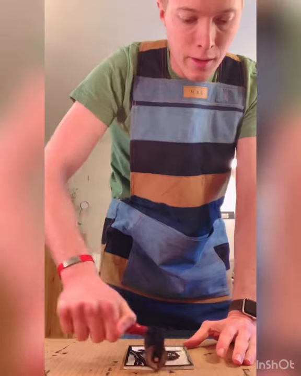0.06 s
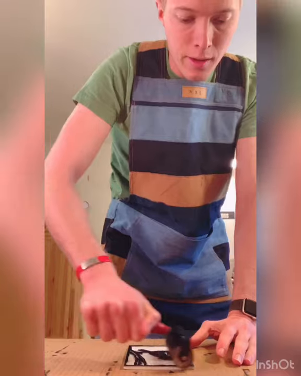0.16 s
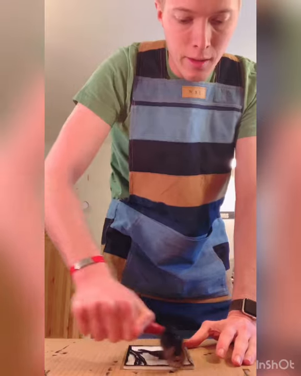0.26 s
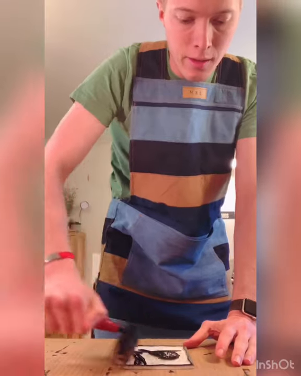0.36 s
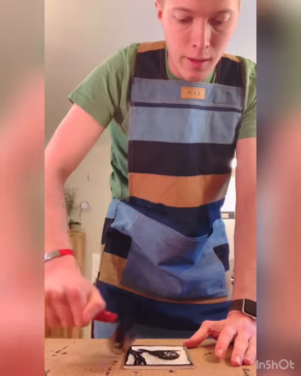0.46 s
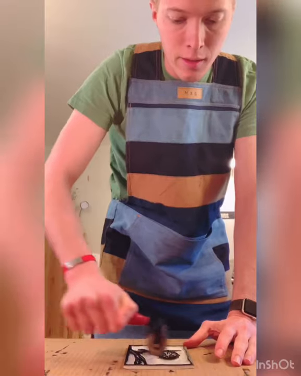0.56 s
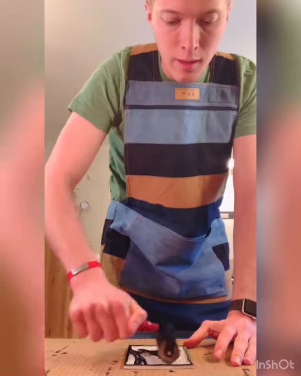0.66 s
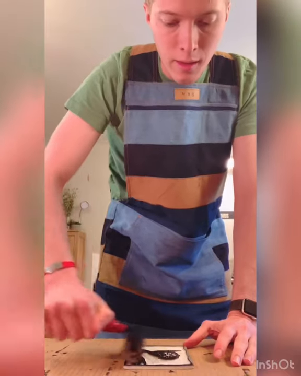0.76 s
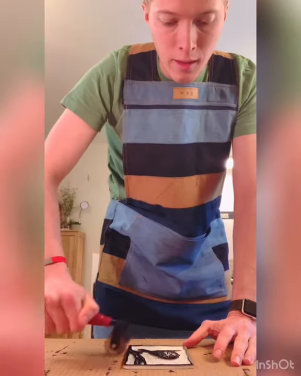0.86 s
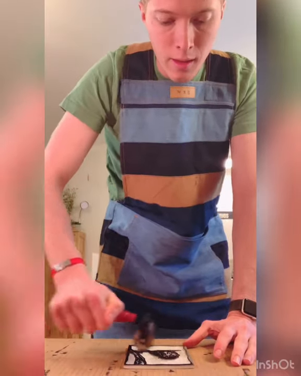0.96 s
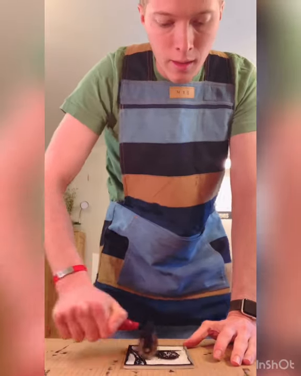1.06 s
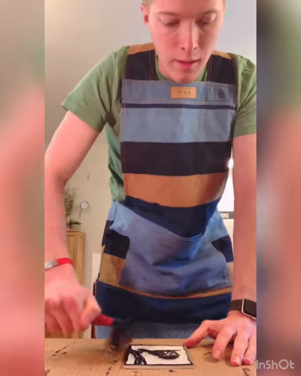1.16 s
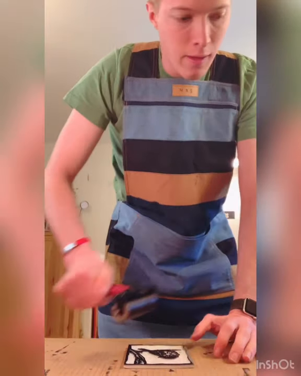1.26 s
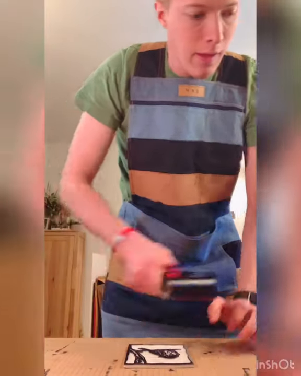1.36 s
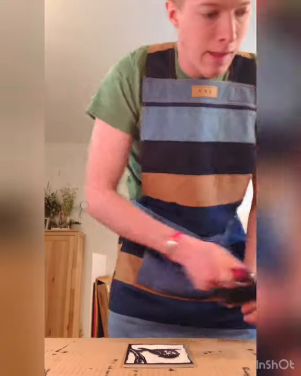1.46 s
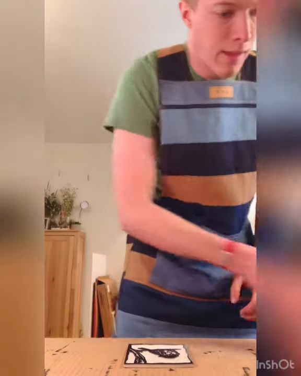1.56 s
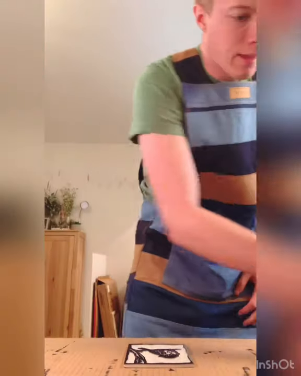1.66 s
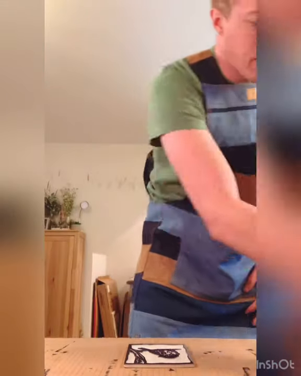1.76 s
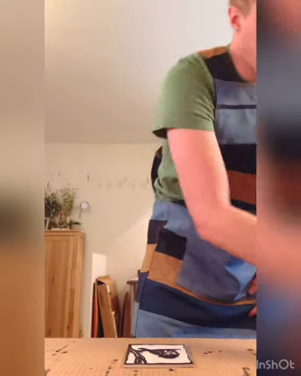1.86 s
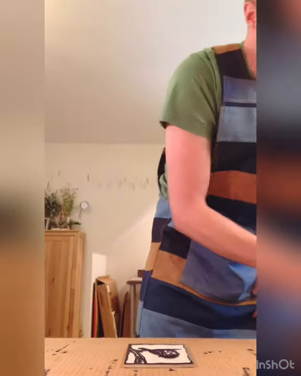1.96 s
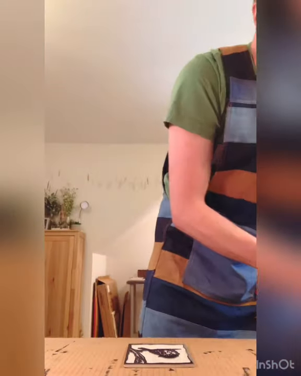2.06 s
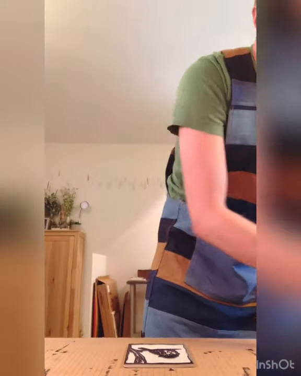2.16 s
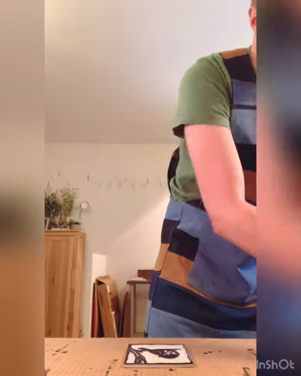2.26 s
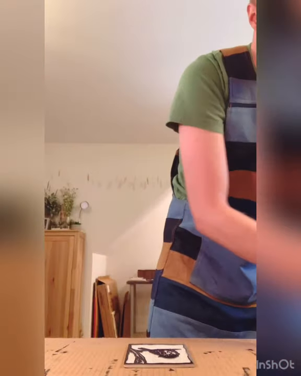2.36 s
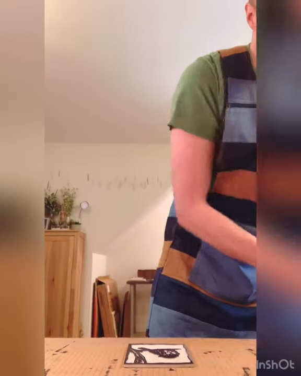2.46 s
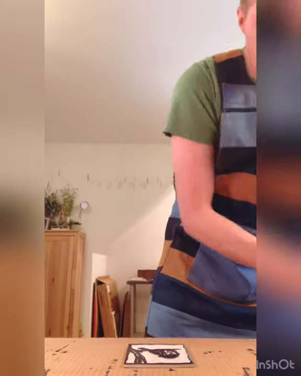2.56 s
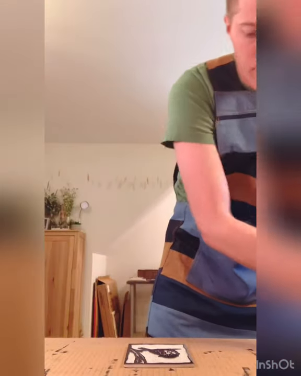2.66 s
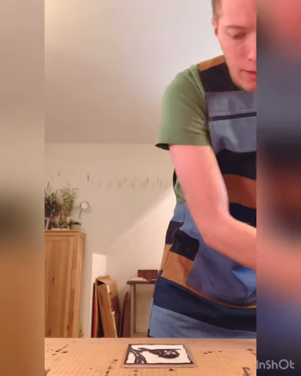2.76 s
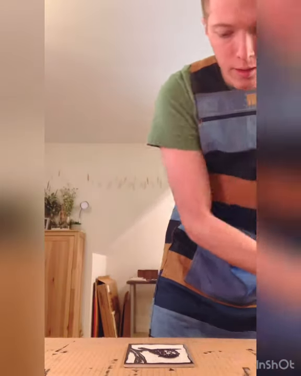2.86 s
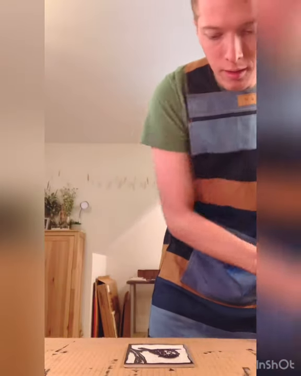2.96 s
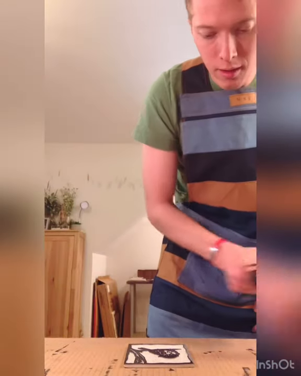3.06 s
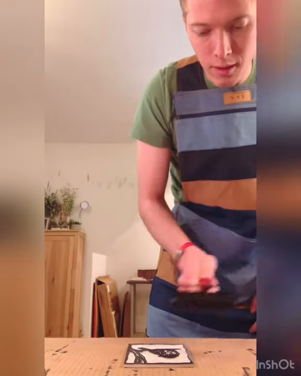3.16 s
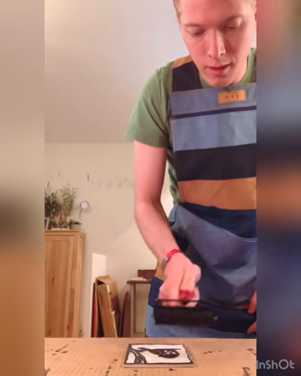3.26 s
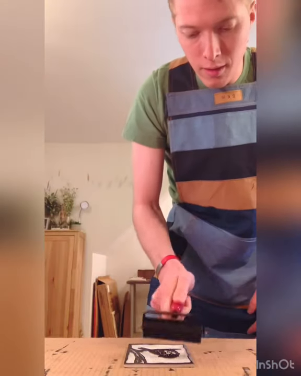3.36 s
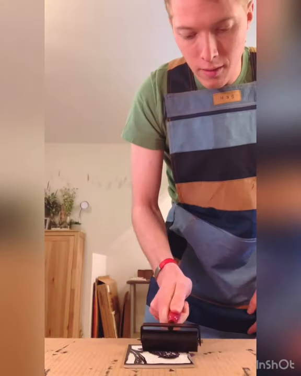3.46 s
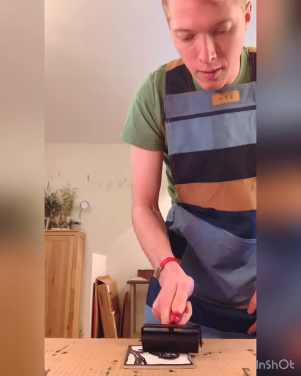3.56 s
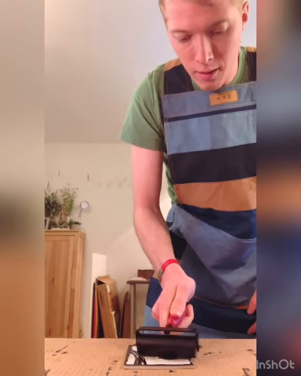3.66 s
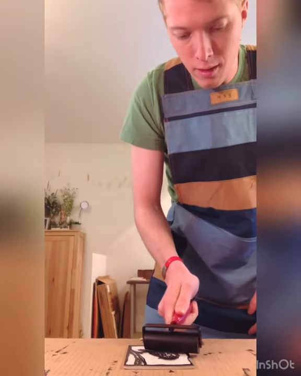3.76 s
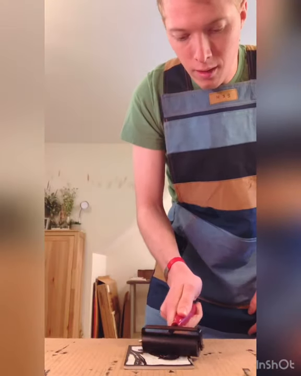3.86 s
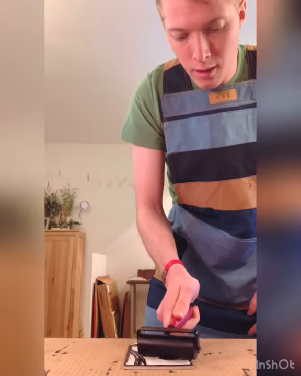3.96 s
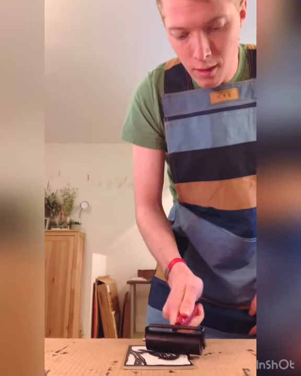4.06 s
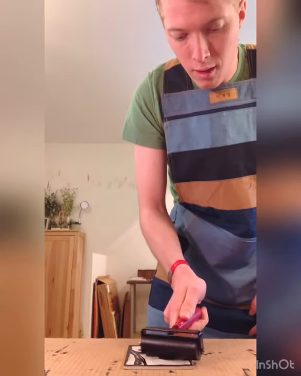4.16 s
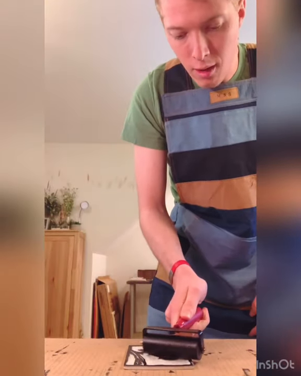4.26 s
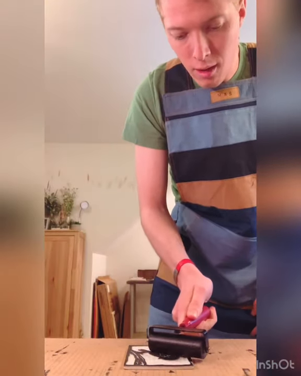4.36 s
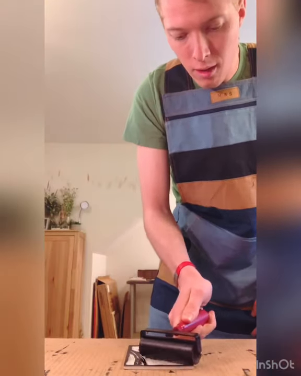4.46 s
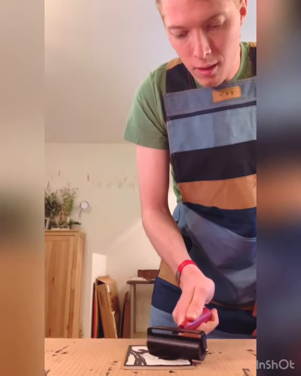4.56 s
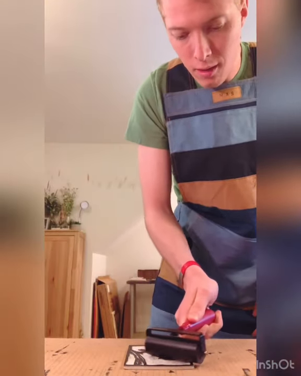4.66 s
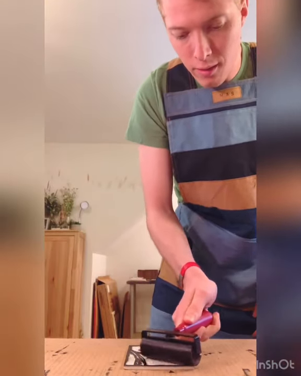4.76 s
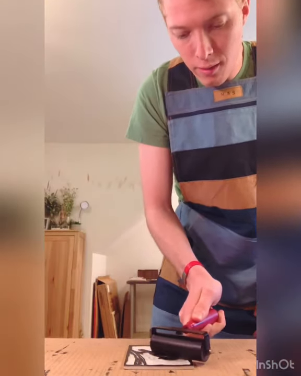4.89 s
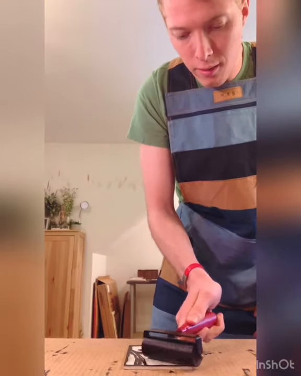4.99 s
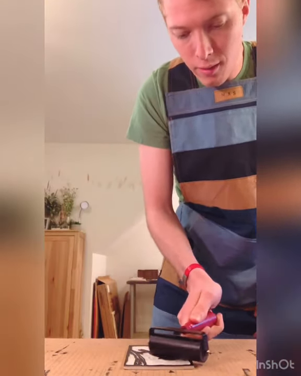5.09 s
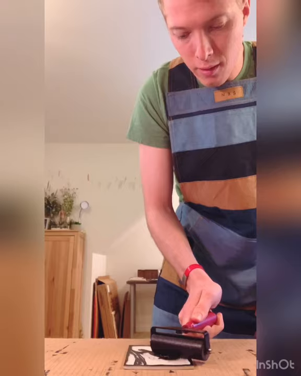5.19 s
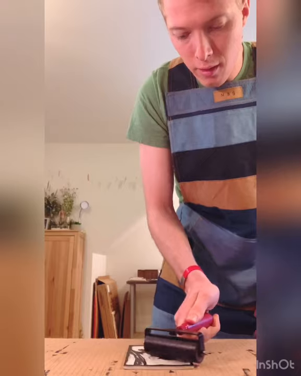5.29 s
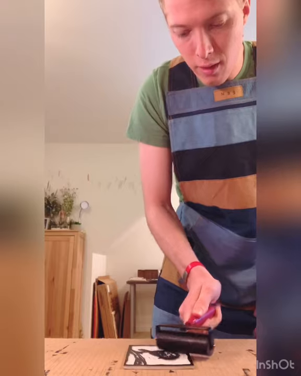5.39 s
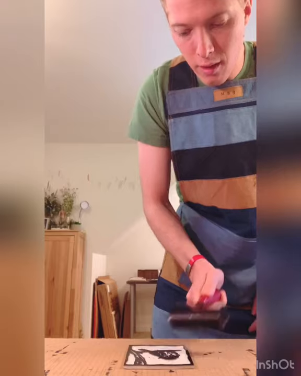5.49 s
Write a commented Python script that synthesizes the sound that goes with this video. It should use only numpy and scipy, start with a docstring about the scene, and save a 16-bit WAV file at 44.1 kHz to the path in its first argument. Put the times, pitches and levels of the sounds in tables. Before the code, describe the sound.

Quiet room, stereo microphone on the bench itself. Barely audible rolling gives way to a cluster of thumps and handle knocks, small ticks and an apron rustle. The roller clacks onto a slab and makes five bright, tacky, tearing hisses with humming rub, the loudest sustained part. A pause, a heavy double thud, then quick back-and-forth rolling on the block, mostly dull bench rumble with faint hiss and regular hollow clicks from the handle.

```python
"""Inking a carved block

A rubber roller loaded with tacky ink goes to and fro over a small carved block, is reloaded on an ink slab
and comes back. Ink threads snap in a fine hiss (dense random clicks); slab, block and bench hum, rattle and
rumble (modes rung by random bumps); set-downs, handle and frame knock (modes rung by single blows).
Apron and sleeve rustle. A two-port microphone stands on the same bench in a quiet room.
"""
import sys
import numpy as np
from scipy import signal
from scipy.fft import rfft, irfft, next_fast_len
from scipy.io import wavfile

SR = 44100
rng = np.random.default_rng(int(sys.argv[2]) if len(sys.argv) > 2 else 0)


def dump_mix(stems):
    """Bounce the given channels to the path in sys.argv[1] as a 16-bit WAV at rate SR."""
    frames = np.atleast_2d(stems).T  # one column per channel
    limited = np.clip(frames, -1, 1)  # hard clip at full scale
    pcm = np.round(limited * 32767).astype(np.int16)
    wavfile.write(sys.argv[1], SR, pcm)


def linear_from_db(decibels):
    """Turn decibels (scalar or array-like) into linear amplitude factors; 0 gives 1."""
    return 10 ** (np.asarray(decibels, float) / 20)


N = 244005

# bench modes: mode_hz, relative_level_db, t60_s
BENCH_MODES = [(65.3, -20, 0.34), (74.1, 3.5, 0.24), (93.5, 3, 0.35), (124.3, 2.5, 0.15), (160.3, -6, 0.2),
               (213.4, -6.5, 0.27)]
# rolled-surface modes: mode_hz, relative_level_db, t60_s
SURFACE_MODES = [(757, 8, 0.017), (1012, -3.5, 0.077), (1120, 3, 0.015), (1246, 6, 0.013),
                 (1331, -9, 0.133), (1450, 3, 0.016), (1870, -3.5, 0.018)]
# roller-frame modes: mode_hz, relative_level_db, t60_s
FRAME_MODES = [(1950, 0, .005), (2500, -1, .005), (3200, -3, .006), (3900, -7, .005)]
# colour of snapping ink, also of the dry ticks: frequency_hz, relative_density_db_per_hz
INK_COLOUR = [(1500, -10), (3500, -12), (5000, -15), (6300, -8), (8500, -1), (11000, 0), (13000, -1.5),
              (16000, -3)]
SHAKE_LATE_S = 0.0061  # shaking lags the hiss


def ink(hiss_gain, sheen_gain):
    """Thousands of ink threads snap each second; the top of their hiss has a level of its own."""
    clicks = grains(per_s=9000.0, spread_db=2.5)
    threads = rms_one(shaped(clicks, INK_COLOUR))
    top = shaped(threads, [(11000, -20), (14200, 0)])
    return hiss_gain * (threads - top) + sheen_gain * top


def block_passes():
    """Gains of hiss, sheen, rub, rattle, rumble over the carved block; rub and rattle follow the rumble."""
    # passes: start_s, length_s, fastest_at_share, ink_hiss_db, bench_rumble_db
    passes = [(-0.05, 0.12, 1, -61.5, -37), (.122, .14, 0.2, -61.5, -44.5), (0.281, 0.12, 0.67, -59, -39),
              (3.48, 0.081, 0.17, -52, -40.5), (3.584, 0.12, 0.7, -61, -42), (3.724, .13, .45, -52, -40.5),
              (3.872, 0.11, .5, -59, -37.5), (4.003, 0.13, .4, -54, -35.5), (4.133, .13, 0.44, -59.5, -35),
              (4.269, .12, 0.49, -52.5, -37.5), (4.401, 0.13, 0.58, -62, -41),
              (4.545, 0.11, .4, -53.5, -41.5), (4.666, 0.11, 0.56, -62, -41),
              (4.816, 0.11, 0.44, -54.5, -40.5), (4.945, 0.12, 0.3, -60, -44.5),
              (5.096, 0.1, 0.27, -56, -42.5), (5.239, 0.11, 0.5, -67.5, -44.5),
              (5.349, 0.15, 0.3, -52, -37.5), (5.493, 0.12, 0.2, -82, -42.5)]
    sheen_re_hiss_db, rub_re_rumble_db, rattle_re_rumble_db = 4.5, -24, -9.5
    start_s, length_s, fastest, hiss_db, rumble_db = np.transpose(passes)
    hiss = swell(start_s, length_s, fastest, hiss_db, curve=1)
    rumble = swell(start_s + SHAKE_LATE_S, length_s, 0.5, rumble_db, curve=0.91)
    sheen = hiss * linear_from_db(sheen_re_hiss_db)
    rub = rumble * linear_from_db(rub_re_rumble_db)
    rattle = rumble * linear_from_db(rattle_re_rumble_db)
    return np.array([hiss, sheen, rub, rattle, rumble])


def slab_passes():
    """Gains of hiss, sheen, rub, rattle, rumble over the ink slab; the rattle follows the rub."""
    # passes: start_s, length_s, fastest_at_share, ink_hiss_db, surface_rub_db
    passes = [(1.837, 0.23, 0.45, -33.5, -32.5), (2.076, 0.23, .6, -44.5, -36.5),
              (2.313, 0.22, 0.41, -32.5, -36.5), (2.539, 0.22, 0.64, -44.5, -40),
              (2.763, 0.19, 0.28, -32.5, -41)]
    sheen_re_hiss_db, rattle_re_rub_db, rumble_db = 1.5, -6.5, -44.5
    start_s, length_s, fastest, hiss_db, rub_db = np.transpose(passes)
    late_s = start_s + SHAKE_LATE_S
    hiss = swell(start_s, length_s, fastest, hiss_db, curve=0.54)
    rub = swell(late_s, length_s, fastest, rub_db, curve=1.0)
    rumble = swell(late_s, length_s + 0.028, 0.71, rumble_db, curve=0.66)
    sheen = hiss * linear_from_db(sheen_re_hiss_db)
    rattle = rub * linear_from_db(rattle_re_rub_db)
    return np.array([hiss, sheen, rub, rattle, rumble])


def skids():
    """Gains of hiss, sheen, rub, rattle, rumble as the roller drops, skids and runs out or pulls free."""
    # skids: start_s, length_s, hiss_loss_db_per_s, ink_hiss_db, surface_rub_db, bench_rumble_db
    runs = [(0.711, 0.17, -4, -56.5, -71, -38), (0.882, 0.27, 136, -53, -52, -60),
            (1.082, 0.16, 28, -59.5, -54, -40), (1.256, 0.065, 56, -52, -63, -49.5),
            (1.352, .2, 279, -60, -55, -44), (1.613, 0.15, 92, -65, -59.5, -56),
            (1.805, 0.043, 7, -58, -38.5, -59), (2.942, 0.26, 207, -55.5, -57, -48),
            (3.152, .12, 350.5, -53, -67, -68)]
    sheen_re_hiss_db, rattle_re_rub_db = -1.5, 3
    dulling_s = 0.23  # the faster a skid dies, the duller: dB per dB/s
    start_s, length_s, loss, hiss_db, rub_db, rumble_db = np.transpose(runs)
    sheen_db = hiss_db + np.maximum(sheen_re_hiss_db - dulling_s * loss, -20)
    hiss = run_out(start_s, length_s, hiss_db, loss)
    sheen = run_out(start_s, length_s, sheen_db, loss)
    rub = run_out(start_s, length_s, rub_db, 0.5 * loss)
    rattle = rub * linear_from_db(rattle_re_rub_db)
    rumble = run_out(start_s, length_s, rumble_db, 0.44 * loss)
    return np.array([hiss, sheen, rub, rattle, rumble])


def swell(start_s, length_s, fastest, level_db, curve):
    """Each movement speeds up from rest and slows to rest; loudness is a power of speed."""
    share = (np.arange(N)[:, None] / SR - start_s) / length_s
    fastest = np.clip(fastest, 0.05, 0.95)
    ramp = np.minimum(share / fastest, (1 - share) / (1 - fastest))
    speed = np.sin(np.pi / 2 * np.clip(ramp, 0, 1))
    return np.sum(linear_from_db(level_db) * speed ** curve, axis=1)


def run_out(start_s, length_s, level_db, loss_db_per_s):
    """Each skid starts almost at once, loses level steadily and stops."""
    rise_s = 0.0042  # the stop takes four times as long
    since_s = np.arange(N)[:, None] / SR - start_s
    edge = np.clip(np.minimum(since_s, (length_s - since_s) / 4) / rise_s, 0, 1)
    falling_db = level_db - loss_db_per_s * np.clip(since_s, 0, 1)
    return np.sum(edge * linear_from_db(falling_db), axis=1)


def surface_rub():
    """The rolled surface hums under the roller, the frame more faintly."""
    surface = rubbed(SURFACE_MODES, per_s=1200.0, spread_db=4.5)
    frame = rubbed(FRAME_MODES, per_s=2100.0, spread_db=5.0)
    return surface + linear_from_db(-6.5) * frame


def block_rattle():
    """Sparse bumps ring the block."""
    # block modes: mode_hz, relative_level_db, t60_s
    block_modes = [(250, -7.5, 0.15), (270, -6.5, 0.095), (361, 0, 0.062), (407, -5.5, 0.047),
                   (517, -3, 0.033), (591, -4, 0.032), (697.7, -8, 0.1)]
    return rubbed(block_modes, per_s=200.0, spread_db=5.0)


def bench_rumble():
    """Slow bumps ring the wooden bench."""
    return rubbed(BENCH_MODES, per_s=51.0, spread_db=1.5)


def rubbed(modes, per_s, spread_db):
    """The roller bumps over an uneven face; each mode feels its own share of the bumps. Rms 1."""
    out = np.zeros(N)
    for hz, level_db, t60_s in modes:
        bumps = grains(per_s, spread_db)
        out += linear_from_db(level_db) * rms_one(ring(bumps, hz, t60_s))
    return rms_one(out)


def blow_list():
    """Set-downs, handle knocks and ticks as rows: s, then dB of tick, snap, clack, knock, thud."""
    # roller set down hard: start_s, bench_thud_db, handle_knock_db, surface_clack_db, frame_snap_db
    hard_landings = [(0.38, -36.5, -49, -59, -58), (0.705, -24, -28, -49, -44),
                     (0.772, -26.5, -31.5, -46.5, -37.5), (0.825, -37.5, -34.5, -50.5, -39),
                     (0.884, -38.5, -30, -41.5, -31.5), (1.087, -24, -25, -46.5, -29.5),
                     (1.147, -38, -45, -73, -62), (1.232, -42.5, -47, -57, -43),
                     (1.811, -33.5, -29.5, -46.5, -33), (1.839, -28.5, -27.5, -36, -26.5),
                     (3.477, -26.5, -36, -41, -23.5), (3.492, -20.5, -29, -49, -58)]
    # the handle takes up its play: start_s, handle_knock_db, frame_snap_db
    handle_plays = [(1.363, -34, -38.5), (2.708, -31, -69), (2.811, -30, -46), (3.851, -30.5, -42.5),
                    (4.106, -27.5, -42), (4.372, -33.5, -46.5), (4.645, -32, -49.5), (4.955, -24.5, -38.5),
                    (5.118, -35, -53), (5.257, -51, -49)]
    # small sharp ticks: start_s, dry_tick_db, frame_snap_db, surface_clack_db
    small_ticks = [(0.37, -38.5, -41, -89), (0.442, -70, -52, -77), (1.13, -70, -39, -68),
                   (1.302, -54, -56, -70), (1.616, -47, -37, -58), (1.661, -83, -45.5, -55),
                   (2.96, -50.5, -40.5, -59), (3.154, -62.5, -36.5, -65)]
    silent_db = -200
    rows = []
    for s, thud, knock, clack, snap in hard_landings:
        rows.append((s, snap - 12.5, snap, clack, knock, thud))
    for s, knock, snap in handle_plays:
        rows.append((s, snap - 9, snap, snap - 21.5, knock, knock - 14.5))
    for s, tick, snap, clack in small_ticks:
        rows.append((s, tick, snap, clack, silent_db, silent_db))
    return np.transpose(rows)


def knocks():
    """Dry tick and frame snap first, then bench thud, surface clack and handle knock within 2.5 ms."""
    # handle modes: mode_hz, relative_level_db, t60_s
    handle_modes = [(251, -7, 0.071), (344, -1, 0.071), (385, 3, 0.052), (573, -3, 0.028)]
    s, tick_db, snap_db, clack_db, knock_db, thud_db = blow_list()
    tick = dry_tick(s, tick_db)
    snap = struck(FRAME_MODES, s, snap_db, contact_hz=6000.0, late_s=0.0, loose=0.12)
    clack = struck(SURFACE_MODES, s, clack_db, contact_hz=3060.0, late_s=0.0012, loose=0.24)
    knock = struck(handle_modes, s, knock_db, contact_hz=491.0, late_s=0.00249, loose=0.032)
    # the pressing hand shortens the bench's ring
    thud = struck(BENCH_MODES, s, thud_db, contact_hz=93.0, late_s=0.00067, loose=0, held=0.7)
    return tick + snap + clack + knock + thud


def dry_tick(s, level_db):
    """A burst of ink-coloured noise decays within milliseconds, without resonance."""
    clicks = np.zeros(N)
    clicks[np.round(s * SR).astype(int)] = linear_from_db(level_db)
    fade = np.exp(-1 / (0.0022 * SR))
    envelope = signal.lfilter([1], [1, -fade], clicks + 1e-18)
    return envelope * rms_one(shaped(rng.standard_normal(N), INK_COLOUR))


def struck(modes, s, blows_db, contact_hz, late_s, loose, held=1):
    """Every blow strikes every mode with a strength of its own; loose parts clatter on for a moment."""
    at = np.round((s + late_s) * SR).astype(int)
    luck_db = rng.normal(0, 2.0, (len(at), len(modes)))
    bounces = loose * grains(per_s=1200.0, spread_db=3.5)
    fade = np.exp(-1 / (0.019 * SR))
    out = np.zeros(N)
    for k, (hz, level_db, t60_s) in enumerate(modes):
        make_up = 1 + (hz / contact_hz) ** 2  # offsets the soft contact's loss at hz
        force = np.zeros(N)
        force[at] = linear_from_db(blows_db + level_db + luck_db[:, k]) * make_up * (-1) ** k
        force += bounces * signal.lfilter([1], [1, -fade], force + 1e-18)
        out += ring(soften(force, contact_hz), hz, t60_s * held)
    return out


def ring(force, hz, t60_s):
    """A two-pole resonator: a unit click sets a sine of height 1 ringing."""
    r, w = linear_from_db(-60 / (t60_s * SR)), 2 * np.pi * hz / SR
    return signal.lfilter([0, np.sin(w)], [1, -2 * r * np.cos(w), r * r], force + 1e-18)


def soften(x, hz):
    """A soft contact: two one-pole low-passes spread a click in time."""
    r = np.exp(-2 * np.pi * hz / SR)
    return signal.lfilter([(1 - r) ** 2], [1, -2 * r, r * r], x + 1e-18)


def grains(per_s, spread_db):
    """Random clicks of either sign, a few much larger than the rest."""
    sizes = linear_from_db(spread_db * np.minimum(rng.exponential(1, N), 5))
    signs = rng.choice([-1, 1], N)
    return sizes * signs * (rng.random(N) < per_s / SR)


def rms_one(x):
    """Scale to rms 1."""
    return x / np.sqrt(np.mean(x ** 2) + 1e-20)


def shaped(x, table):
    """Filter by a (Hz, dB) or (Hz, dB, radians) table, joined on a log-frequency axis."""
    size = next_fast_len(N + 4096)
    log_hz = np.log(np.maximum(np.arange(size // 2 + 1) * SR / size, 1))
    hz, db, *turn = np.transpose(table)
    gain = linear_from_db(np.interp(log_hz, np.log(hz), db))
    if turn:
        gain = gain * np.exp(1j * np.interp(log_hz, np.log(hz), turn[0]))
    return irfft(rfft(x, size) * gain, size)[..., :N]


def rustle():
    """Apron and sleeve slide as the printer turns: cloth on cloth in short spells, still in between."""
    # spells: start_s, length_s, fastest_at_share, rustle_db
    spells = [(1.279, 0.079, 0, -49.5), (1.529, 0.32, 0.46, -60), (2.934, 0.26, 1, -63.5)]
    # cloth colour: frequency_hz, relative_density_db_per_hz
    cloth_colour = [(300, -34), (1000, 3), (2500, 4), (3800, 8.5), (5000, 4), (9000, -18.5), (14000, -39)]
    cloth = rms_one(shaped(grains(per_s=1600.0, spread_db=2.0), cloth_colour))
    return swell(*np.transpose(spells), curve=0.41) * cloth


def room(x):
    """Eight feedback delays, duller on every round, summed on a frequency grid."""
    t60_s, wall_cut_hz = 0.23, 6200  # t60 before the dulling
    size = next_fast_len(N + SR)
    w = 2 * np.pi * np.arange(size // 2 + 1) / size
    dull = 1 / (1 + 1j * w * SR / (2 * np.pi * wall_cut_hz))
    lags = rng.uniform(0.012, 0.04, (8, 1)) * SR
    loop = linear_from_db(-60 * lags / SR / t60_s) * dull * np.exp(-1j * w * lags)
    walls = signal.sosfilt(signal.butter(2, 300, "high", fs=SR, output="sos"), x)
    return irfft(rfft(walls, size) * np.sum(loop / (1 - loop), axis=0), size)[:N]


def room_tone():
    """Three independent steady noises with the quiet room's spectrum."""
    # room spectrum: frequency_hz, density_db_per_hz
    room_spectrum = [(30, -87), (60, -75), (90, -89.5), (150, -106), (220, -106), (600, -113), (1500, -116),
                     (3000, -120), (7000, -126), (13000, -131), (16000, -142)]
    return shaped(rng.standard_normal((3, N)), room_spectrum) * np.sqrt(SR / 2)


def ports(x):
    """Two microphone ports: the right is coloured and turned in phase, the left is delayed 5 samples."""
    # right port's response: frequency_hz, gain_db, phase_rad
    right_response = [(30, -2, -.1), (100, -3.5, -.26), (200, -6.5, -.37), (280, -9, -.6), (340, -14, -1.6),
                      (430, -5, -2.9), (500, -3.5, -3.4), (700, -2.5, -4.2), (1000, -1.5, -4.95),
                      (1500, -1.5, -5.4), (2500, -.5, -5.85), (3500, 0, -6.0), (5000, 0, -6.6),
                      (7000, 0, -5.9), (9000, 0, -6.3), (12000, 0, -5.95), (16000, 0, -6.0)]
    left = np.pad(x, (5, 0))[:N]
    return np.array([left, shaped(x, right_response)])


def scene():
    """Ink, frame, surfaces and bench share the strokes; the room adds its tone and a short tail."""
    hiss, sheen, rub, rattle, rumble = block_passes() + slab_passes() + skids()
    rolling = rub * surface_rub() + rattle * block_rattle() + rumble * bench_rumble()
    work = ink(hiss, sheen) + rolling + knocks() + rustle()
    # each port hears walls of its own and a little room tone of its own
    echo = np.array([room(work), room(work)])
    tone = room_tone()
    return ports(work + tone[0]) + linear_from_db(-14) * echo + linear_from_db(-5.0) * tone[1:]


def roll_off(x):
    """The treble ends steeply here."""
    return signal.sosfilt(signal.butter(12, 16350, fs=SR, output="sos"), x)


def record(dry):
    """The microphone drops the deepest bass; a steep low-pass cuts the top."""
    low_cut = signal.butter(3, 50.2, "high", fs=SR, output="sos")
    top_cut = signal.ellip(10, 0.5, 60, 15850, fs=SR, output="sos")
    mix = signal.sosfilt(np.vstack([low_cut, top_cut]), dry)
    return roll_off(mix)


dry = scene()
out = record(dry)
dump_mix(out)
```